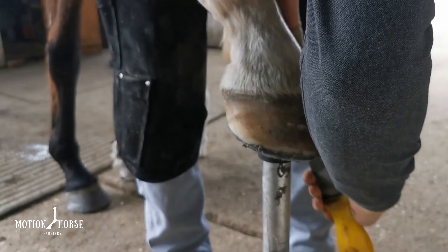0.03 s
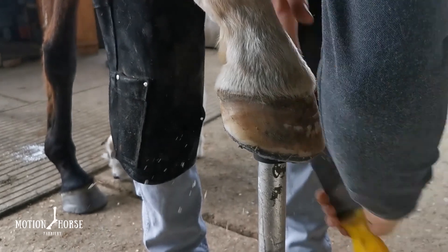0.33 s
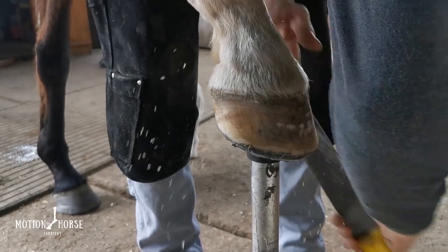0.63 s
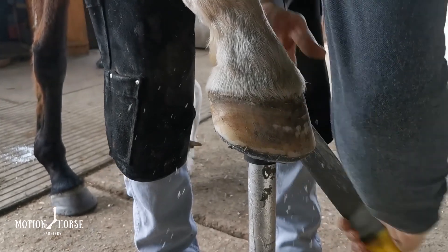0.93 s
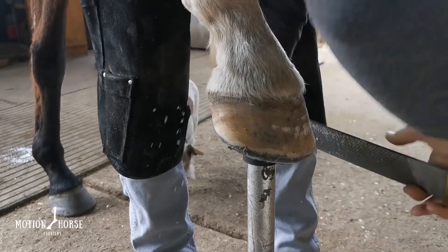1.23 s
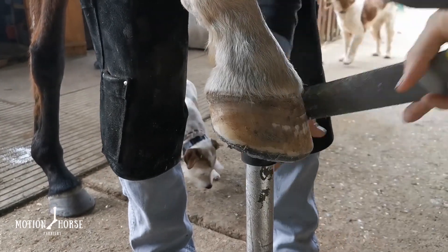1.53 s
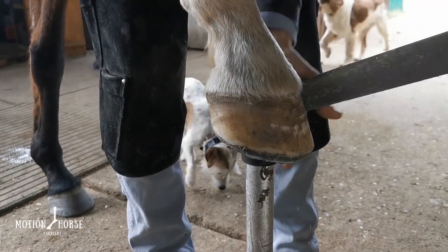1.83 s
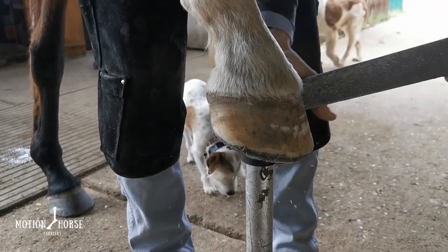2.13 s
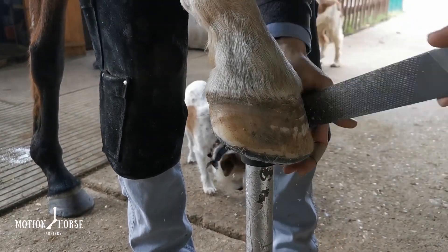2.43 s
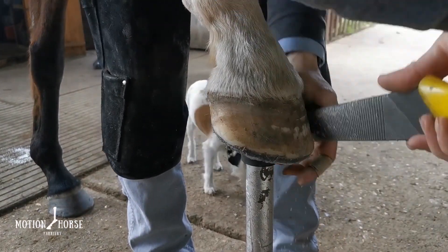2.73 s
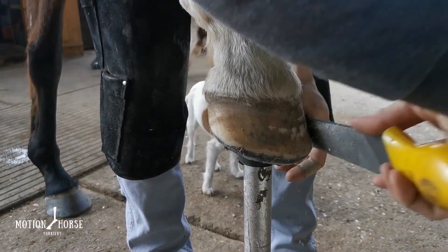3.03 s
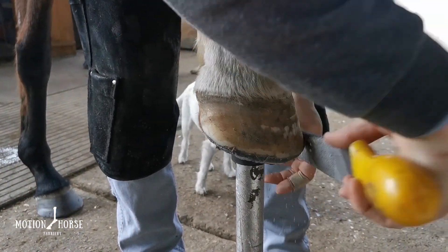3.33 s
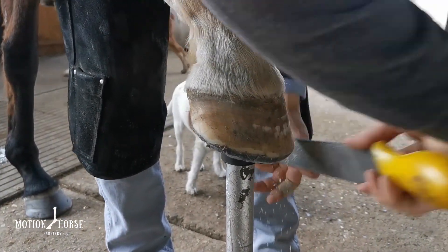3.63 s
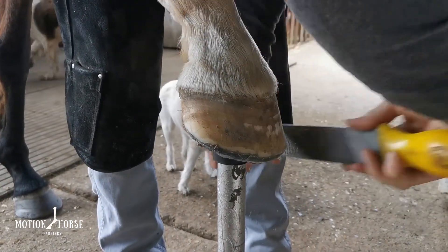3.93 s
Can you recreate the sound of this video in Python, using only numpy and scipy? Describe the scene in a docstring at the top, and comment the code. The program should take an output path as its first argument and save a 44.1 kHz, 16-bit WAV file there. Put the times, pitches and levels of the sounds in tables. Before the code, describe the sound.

A metal rasp scrapes a horse's hoof close by, in quick, light strokes until about 1.2 seconds. After a short pause, the blade ticks down at 1.5 seconds and louder strokes follow, about three a second, quickening after 3 seconds and continuing to the end. Dull thuds and clanks from the steel stand accompany the strokes, strongest near 0.4 seconds. A faint low yard rumble lies underneath.

```python
"""A rasp scrapes through horn, with a clank and a thud: a farrier works a horse's hoof on a steel stand.
The teeth tear the horn in quick arched strokes; the blade ticks as it lands and squeaks as it slips.
The stand clanks as the hoof rocks on it; hoof and leg thud and judder under the push.
All is close by, in an open yard: low rumble, a faint whirr, a weak echo from the stable wall."""
import sys
import numpy as np
from scipy import signal
from scipy.fft import rfft, irfft
from scipy.io import wavfile

SR = 44100
rng = np.random.default_rng(int(sys.argv[2]) if len(sys.argv) > 2 else 0)


def to_wav(s):
    """Save 16-bit WAV."""
    ch = np.atleast_2d(s).T  # columns
    pcm = np.round(np.clip(ch, -1, 1) * 32767)  # PCM
    wavfile.write(sys.argv[1], SR, pcm.astype(np.int16))


N = 176400
TIME_S = np.arange(N) / SR
RING_TIME_S = TIME_S[:SR // 2]

# yard rumble and air (frequency [Hz], relative density [dB])
YARD_SPECTRUM = [(20, -1.5), (90, 8), (190, -3), (380, -19.5), (800, -16.5), (2800, -28), (12000, -33)]
# left-right likeness (frequency [Hz], correlation [0-1])
STEREO_LIKENESS = [(900, 0.76), (3000, 0.26)]
# scrape phase (frequency [Hz], left lead [rad])
STEREO_LEAD = [(2000, -0.37), (7000, -1.8), (12000, -1.5)]
# scrape balance (frequency [Hz], left minus right [dB])
STEREO_BALANCE = [(300, 7), (1200, 0.5), (5000, 0), (12000, -2)]
# steel slips (time [s], level [dB], starting pitch [Hz])
SLIP_SQUEAKS = [(2.194, -42, 495), (3.115, -48, 590), (3.434, -39.5, 543)]
# hoof on its stand (frequency [Hz], relative level [dB], T60 [s])
HOOF_MODES = [(127, -0.5, 0.34), (188, 5, 0.28), (261.5, 1.5, 0.28)]
# thuds as a stroke lands (time [s], level [dB], starting pitch [Hz])
LEG_THUDS = [(0.048, -17.5, 170.3), (0.338, -27, 176), (0.411, -26, 198.6), (0.423, -16.5, 257.5),
             (1.156, -23.5, 177), (1.494, -24, 180), (2.24, -24, 240.6), (2.509, -28.5, 201),
             (2.558, -23.5, 178.5), (2.681, -17.5, 167), (2.82, -25.5, 199.5), (3.825, -26, 205)]
# judders under the push (peak time [s], level [dB], pitch [Hz])
LEG_JUDDERS = [(0.087, -20.5, 141), (0.181, -26, 188), (0.546, -23, 188.7), (.795, -25.5, 127.6),
               (0.896, -19, 183.2), (1.756, -26.5, 125.5), (2.019, -31.5, 120), (2.362, -29, 121.4),
               (2.974, -24.5, 263.2), (3.325, -26, 260.3), (3.973, -21.5, 125)]
# steel stand (frequency [Hz], relative level [dB])
STAND_MODES = [(640, -8), (800, 0.5), (850, 1.5), (1034, -3.5), (1410, -1), (1743, -12.5), (1890, -3.5)]
# hoof rocks the stand (time [s], relative level [dB])
STAND_CLANKS = [(.046, -18), (0.191, -28.5), (0.337, -40), (0.398, -19), (0.408, -11.5), (.515, -30),
                (.839, -38.5), (1.164, -20), (1.514, -22), (2.087, -31.5), (2.239, -20), (2.672, -18),
                (2.876, -24.5), (3.315, -22), (3.341, -23), (3.647, -27), (3.83, -16.5), (3.981, -27)]
# steel on horn (frequency [Hz], relative density [dB])
SCRAPE_SPECTRUM = [(330, -9), (650, 4), (2000, 6.5), (2700, 1.5), (3600, 5), (5600, 5), (9000, -6),
                   (11300, -2), (11800, 2.5), (12500, -3)]
# blade lands on horn (time [s], level [dB])
BLADE_TICKS = [(1.488, -27), (1.504, -27), (1.930, -35), (2.23, -30.5), (2.508, -34.5), (2.817, -32.5),
               (2.876, -26.5), (3.194, -35.5), (3.445, -25)]
# rasp strokes (start [s], end [s], level [dB], extra top [dB])
RASP_STROKES = [(-.07, 0.152, -36, 2), (0.119, 0.318, -44.5, 1), (0.304, 0.526, -38.5, 4),
                (0.502, 0.677, -47.5, 5.5), (0.659, 0.863, -38, 4.5), (0.824, 1.001, -45, 3),
                (0.985, 1.152, -43.5, 7.5), (1.492, 1.576, -46.5, 1), (1.555, 1.778, -29, 1),
                (1.89, 2.097, -28, -2), (2.209, 2.404, -30.5, -2), (2.517, 2.726, -33, 3.5),
                (2.835, 3.02, -30.5, 3.5), (3.026, 3.219, -35.5, 1.5), (3.149, 3.369, -36.5, 7),
                (3.39, 3.536, -34, 0.5), (3.515, 3.683, -34, 7.5), (3.801, 4.018, -32, 3)]

YARD_DB, LOW_BALANCE_DB = -49.5, 3.5  # balance: left minus right
WHIRR_SPAN_S, WHIRR_DB, WHIRR_HZ, WHIRR_FILTER_T60_S = (1.4, 2.76), -57, 1810, 0.011
ECHO_DB, ECHO_T60_S, ECHO_CUTOFF_HZ = -15.5, 0.22, 3880
SQUEAK_S, SQUEAK_FALL_PER_S = 0.038, 8.5
THUD_RISE_S, THUD_T60_S, THUD_RING_DB, HOOF_LOW_CUT_HZ = 0.006, 0.17, -8.5, 54
JUDDER_HALF_WIDTH_S, SAG_PER_S = 0.02, 1.15  # pitch sags as the push eases
STAND_T60_CYCLES, STRIKE_DETUNE, STRIKE_SPREAD_DB = 52, 0.025, 5
CLANK_GAIN_DB, STAND_RUB_DB = -1.5, -14.5
RATTLE_PER_S, RATTLE_SHARE, RATTLE_DECAY_S = 1500, 0.3, 0.021
CRACK_GAIN_DB, CRACK_LOW_HZ, CRACK_HIGH_HZ, CRACK_DECAY_S = -14.5, 690, 2020, 0.011
FRACTURES_PER_S, FRACTURE_SPREAD_DB, CHATTER_DB, CHATTER_HZ = 11000, 2, 1.4, 138
PATCH_DB, PATCH_HZ, PATCH_S = 4.6, 146, 0.019  # drifting resonances: depth, width, duration
SING_SPAN_S, SING_DB, SING_HZ, SING_WIDTH_HZ = (2.53, 4.16), 10, 4220, 610
DRAG_SPAN_S, DRAG_DB = (1.64, 2.04), -54.5  # blade drawn back lightly
MID_EDGE_HZ, TOP_EDGE_HZ = 2740, 7600  # scrape bands: mid, bite, top
MID_DB, MID_FOLLOW = -17.5, 0.63  # light strokes keep more midrange
SHUDDER_DB, SHUDDER_FOLLOW, WANDER_S, WANDER_HZ = -22, 0.38, 0.0009, 11
MID_EXP, BITE_EXP, TOP_EXP, SHUDDER_EXP = 1.41, 2.37, 2.32, 0.32  # amplitude ~ speed ** exponent


def amp(db):
    """Decibels to gain."""
    return 10 ** (np.asarray(db) / 20)


def unit(x):
    """Scale to rms 1."""
    return x / np.sqrt(np.mean(x ** 2) + 1e-20)


def read(points, hz):
    """Table lookup on a log-frequency axis."""
    table_hz, value = np.transpose(points)
    return np.interp(np.log(hz + 1), np.log(table_hz + 1), value)


def add(mix, at_s, sound):
    """Mix a sound in, in place."""
    part = mix[..., max(round(at_s * SR), 0):][..., :sound.shape[-1]]
    part += sound[..., :part.shape[-1]]


def butter(x, hz, kind="low", order=2):
    """Butterworth filter."""
    return signal.sosfilt(signal.butter(order, hz, kind, fs=SR, output="sos"), x)


def convolve(x, response):
    """Convolution cut to the input length."""
    return signal.fftconvolve(np.atleast_2d(x), np.atleast_2d(response), axes=1)[:, :x.shape[-1]]


def resonate(force, response):
    """Drive a resonator at unit gain for white noise."""
    return convolve(force, response / np.linalg.norm(response[0]))


def lean_left(x):
    """Pan by LOW_BALANCE_DB."""
    return x * amp([[LOW_BALANCE_DB / 2], [-LOW_BALANCE_DB / 2]])


def right_spectrum(left, independent, hz):
    """Right channel: like the left in the bass, less so in the treble."""
    likeness = read(STEREO_LIKENESS, hz)
    return likeness * left + np.sqrt(1 - likeness ** 2) * independent


def ring(modes, skew_rad):
    """Decaying modes with opposite random phases left and right."""
    phases = skew_rad * rng.uniform(-1, 1, (len(modes), 1, 1)) * np.array([[1], [-1]])
    return sum(amp(db - 60 * RING_TIME_S / t60_s) * np.sin(2 * np.pi * hz * RING_TIME_S + phase)
               for (hz, db, t60_s), phase in zip(modes, phases))


def falling_tone(t, hz, fall_per_s):
    """Sine with exponentially sinking pitch."""
    return np.sin(2 * np.pi * np.cumsum(hz * np.exp(-fall_per_s * t)) / SR)


def arch(start_s, end_s, peak_share=0.42):
    """Skewed half sine: 0 to 1 and back."""
    peak_s = start_s + peak_share * (end_s - start_s)
    return np.abs(np.sin(np.pi * np.interp(TIME_S, [start_s, peak_s, end_s], [0, 0.5, 1])))


def yard_air():
    """Low rumble and thin air."""
    hz = np.fft.rfftfreq(N, 1 / SR)
    left, independent = rfft(rng.standard_normal((2, N)))
    spectrum = lean_left(np.array([left, right_spectrum(left, independent, hz)]))
    return amp(YARD_DB) * unit(irfft(spectrum * amp(read(YARD_SPECTRUM, hz)), N))


def whirr():
    """Faint narrow-band noise that swells and fades."""
    mode = ring([(WHIRR_HZ, 0, WHIRR_FILTER_T60_S)], skew_rad=0.65)
    band = resonate(resonate(rng.standard_normal((2, N)), mode), mode)
    return amp(WHIRR_DB) * unit(band) * arch(*WHIRR_SPAN_S)


def wall_echo(direct):
    """Short, dull reflection from the stable wall."""
    noise = butter(rng.standard_normal((2, len(RING_TIME_S))), ECHO_CUTOFF_HZ)
    return amp(ECHO_DB) * resonate(direct, noise * amp(-60 * RING_TIME_S / ECHO_T60_S))


def squeaks():
    """Soft tones that slide down as the steel slips."""
    out, t = np.zeros(N), TIME_S[TIME_S < SQUEAK_S]
    envelope = np.sin(np.pi * np.sqrt(t / SQUEAK_S)) ** 2
    for at_s, db, hz in SLIP_SQUEAKS:
        add(out, at_s, amp(db) * envelope * falling_tone(t, hz, SQUEAK_FALL_PER_S))
    return out


def thuds(hoof):
    """The leg gives under the push: sudden thuds that ring the hoof, and slower judders."""
    leg, horn = np.zeros(N), np.zeros((2, N))
    rise = 1 - np.exp(-(RING_TIME_S / THUD_RISE_S) ** 2)
    for at_s, db, hz in LEG_THUDS:
        onset_s = at_s - THUD_RISE_S / 2
        envelope = rise * amp(db - 60 * RING_TIME_S / THUD_T60_S)
        add(leg, onset_s, envelope * falling_tone(RING_TIME_S, hz, SAG_PER_S))
        add(horn, onset_s, rise * amp(db + THUD_RING_DB) * hoof)
    for peak_s, db, hz in LEG_JUDDERS:
        t = RING_TIME_S - min(peak_s, 4 * JUDDER_HALF_WIDTH_S)
        envelope = amp(db) * np.exp(-(t / JUDDER_HALF_WIDTH_S) ** 2)
        add(leg, peak_s + t[0], envelope * falling_tone(t, hz, SAG_PER_S))
    return lean_left(leg) + horn


def stand_ring():
    """Stand response; strike point and load vary each mode's pitch and strength."""
    modes = []
    for hz, db in STAND_MODES:
        struck_hz = hz * (1 + STRIKE_DETUNE * rng.uniform(-1, 1))
        struck_db = db + STRIKE_SPREAD_DB * rng.uniform(-1, 1)
        modes.append((struck_hz, struck_db, STAND_T60_CYCLES / hz))
    return ring(modes, skew_rad=1)


def clanks():
    """The hoof rocks the stand: a rattling blow on loose steel and a dull crack."""
    steel, crack_envelope = np.zeros((2, N)), np.zeros(N)
    for at_s, db in STAND_CLANKS:
        signs = rng.choice([-1, 1], len(RING_TIME_S))
        bounces = rng.random(len(RING_TIME_S)) < RATTLE_PER_S / SR
        blow = RATTLE_SHARE * signs * bounces * np.exp(-RING_TIME_S / RATTLE_DECAY_S)
        blow[0] = 1  # first impact
        add(steel, at_s, amp(db) * convolve(blow / np.linalg.norm(blow), stand_ring() / 2))
        add(crack_envelope, at_s, amp(db) * np.exp(-RING_TIME_S / CRACK_DECAY_S))
    noise = rng.standard_normal((3, N)) * np.sqrt(SR / 2 / CRACK_HIGH_HZ)  # left, right, common
    crack = butter(crack_envelope * (noise[2] + 0.5 * noise[:2]), CRACK_HIGH_HZ, order=4)
    crack = butter(crack, CRACK_LOW_HZ, "high", order=4)
    return amp(CLANK_GAIN_DB) * steel + amp(CRACK_GAIN_DB) * crack


def horn_fractures():
    """Tiny fractures, clumped as the rows of teeth catch and slip."""
    sizes = amp(FRACTURE_SPREAD_DB * np.minimum(rng.exponential(1, (2, N)), 5))
    signs = rng.choice([-1, 1], (2, N))
    chatter = amp(CHATTER_DB * unit(butter(rng.standard_normal(N), CHATTER_HZ)))
    breaks = rng.random((2, N)) < FRACTURES_PER_S / SR
    return unit(sizes * signs * breaks * chatter)


def drifting_resonances(bins, frames, bin_hz, hop_s):
    """Stereo gain in smooth random patches over frequency and time."""
    field = np.fft.fft2(rng.standard_normal((3, bins, frames)))  # left, right, common
    across = np.fft.fftfreq(bins, bin_hz)[:, None] * PATCH_HZ
    along = np.fft.fftfreq(frames, hop_s) * PATCH_S
    patches = unit(np.fft.ifft2(field * np.exp(-2 * (across ** 2 + along ** 2))).real)
    return unit(amp(PATCH_DB * unit(patches[:2] + patches[2])))


def horn_colour(force):
    """Steel-on-horn spectrum in stereo; the blade sings as it is turned round the toe."""
    hz, frame_s, (left, independent) = signal.stft(force, SR, nperseg=512, noverlap=384)
    drift = drifting_resonances(*left.shape, bin_hz=hz[1], hop_s=128 / SR)
    hz = hz[:, None]
    right = right_spectrum(left, independent, hz) * np.exp(-1j * read(STEREO_LEAD, hz))
    pan = amp(read(STEREO_BALANCE, hz) / 2)
    spectrum = np.array([left * pan, right / pan]) * unit(amp(read(SCRAPE_SPECTRUM, hz))) * drift
    turn = np.interp(frame_s, TIME_S, arch(*SING_SPAN_S))
    sing = amp(SING_DB * turn * np.exp(-((hz - SING_HZ) / SING_WIDTH_HZ) ** 2))
    return signal.istft(spectrum * sing, nperseg=512, noverlap=384)[1][:, :N]


def blade_envelopes():
    """Mid, bite, top and shudder amplitudes: strokes, back drag and landing ticks, summed in power."""
    power = np.zeros((4, N))
    for start_s, end_s, db, top_db in RASP_STROKES:
        speed = arch(start_s, end_s)
        power[0] += (amp(MID_DB + MID_FOLLOW * db) * speed ** MID_EXP) ** 2
        power[1] += (amp(db) * speed ** BITE_EXP) ** 2
        power[2] += (amp(db + top_db) * speed ** TOP_EXP) ** 2
        power[3] += (amp(SHUDDER_DB + SHUDDER_FOLLOW * db) * speed ** SHUDDER_EXP) ** 2
    power[:3] += (amp(DRAG_DB) * arch(*DRAG_SPAN_S)) ** 2
    rise_s, t60_s = 0.00025, 0.05
    for at_s, db in BLADE_TICKS:
        tick = np.minimum(RING_TIME_S / rise_s, 1) * amp(db - 60 * RING_TIME_S / t60_s)
        add(power[:3], at_s - rise_s, tick ** 2)
    return np.sqrt(power)


def rasp(stand, hoof):
    """Teeth tear horn: the scrape, and what it shakes in stand and hoof."""
    mid, bite, top, shudder = blade_envelopes()
    grains, hz = horn_fractures(), np.fft.rfftfreq(N, 1 / SR)
    below_mid = irfft(rfft(grains) / (1 + (hz / MID_EDGE_HZ) ** 6), N)
    below_top = irfft(rfft(grains) / (1 + (hz / TOP_EDGE_HZ) ** 6), N)
    scrape = horn_colour(mid * below_mid + bite * (below_top - below_mid) + top * (grains - below_top))
    wander_s = WANDER_S * unit(butter(rng.standard_normal(N), WANDER_HZ))  # shifting load bends pitch
    hoof_rub = resonate(shudder * grains[1], hoof)
    hoof_rub = np.array([np.interp(TIME_S + wander_s, TIME_S, channel) for channel in hoof_rub])
    stand_rub = amp(STAND_RUB_DB) * resonate(mid * grains[0], stand)
    return scrape + stand_rub + hoof_rub


def scene():
    """The farrier's work, its echo and the yard."""
    hoof = butter(lean_left(ring(HOOF_MODES, skew_rad=0)), HOOF_LOW_CUT_HZ, "high")
    work = rasp(stand_ring(), hoof) + clanks() + thuds(hoof) + squeaks()
    return work + wall_echo(work) + yard_air() + whirr()


def record(dry):
    """Steep low-pass band limit."""
    taps = signal.firwin(511, cutoff=16150, window=("kaiser", 9), fs=SR)
    return signal.oaconvolve(dry, taps[None], "same")


dry = scene()
out = record(dry)
to_wav(out)
```